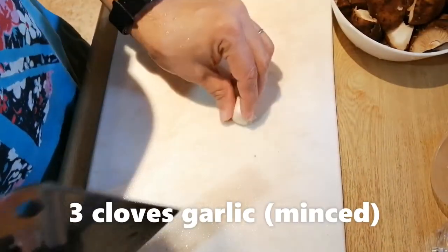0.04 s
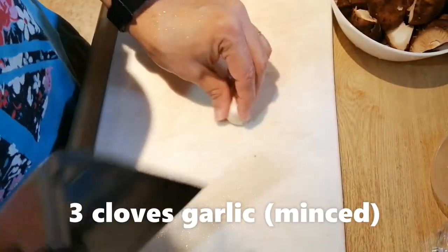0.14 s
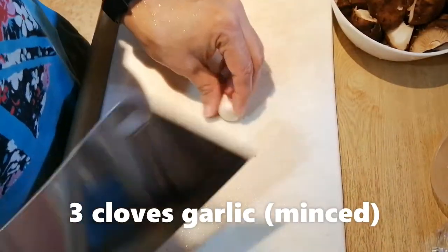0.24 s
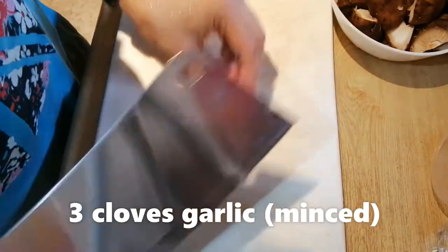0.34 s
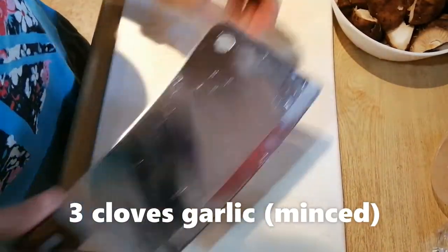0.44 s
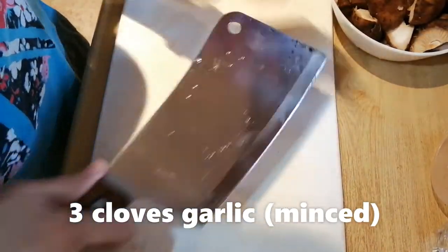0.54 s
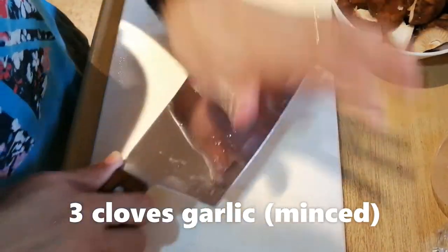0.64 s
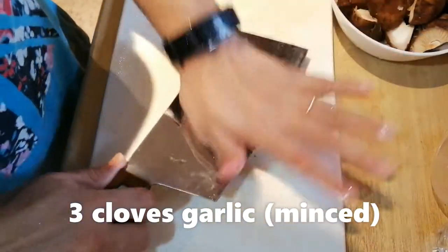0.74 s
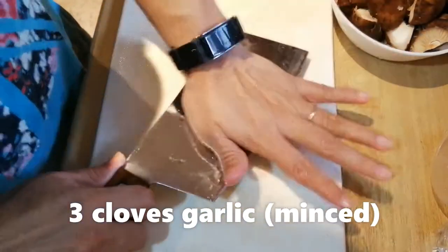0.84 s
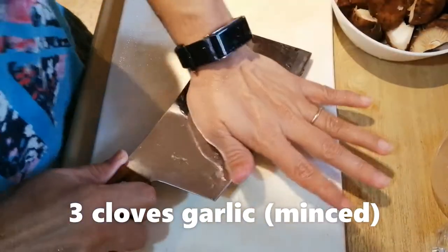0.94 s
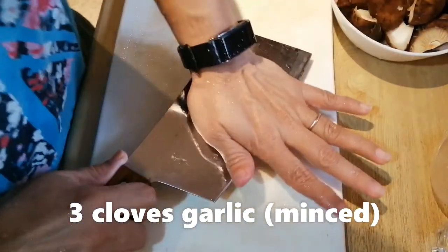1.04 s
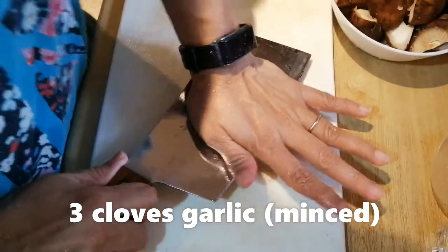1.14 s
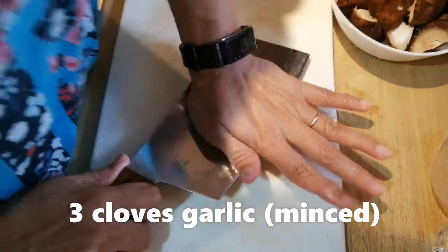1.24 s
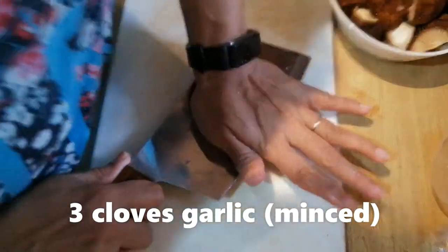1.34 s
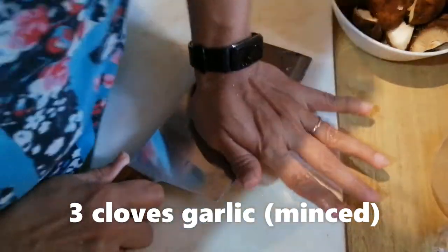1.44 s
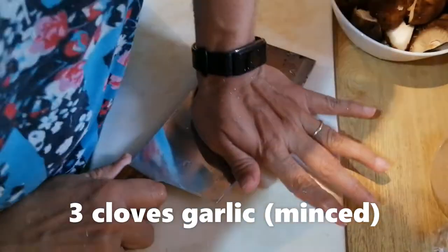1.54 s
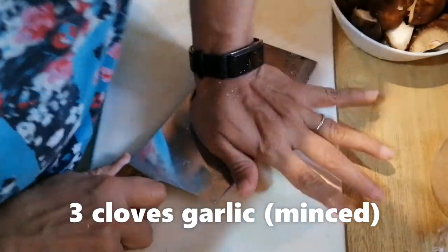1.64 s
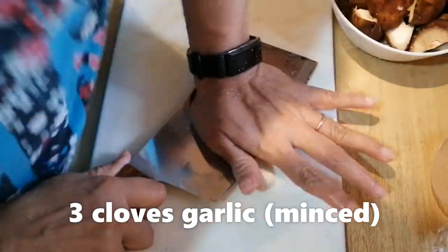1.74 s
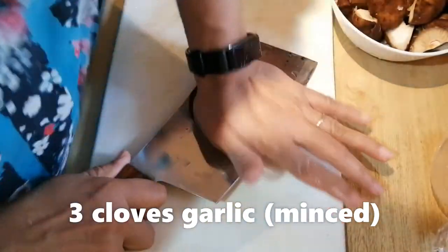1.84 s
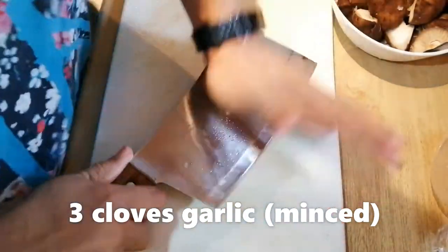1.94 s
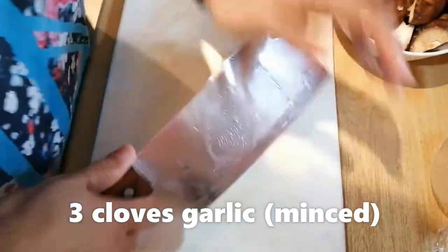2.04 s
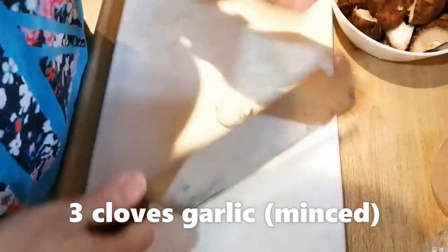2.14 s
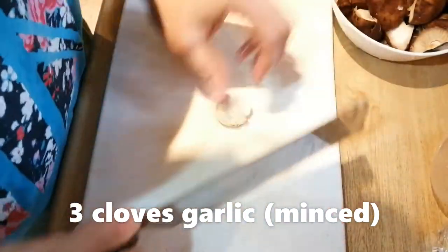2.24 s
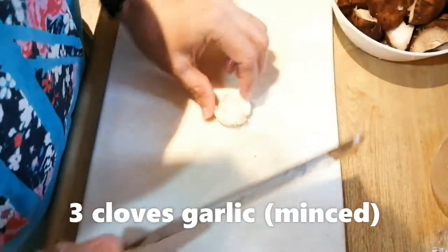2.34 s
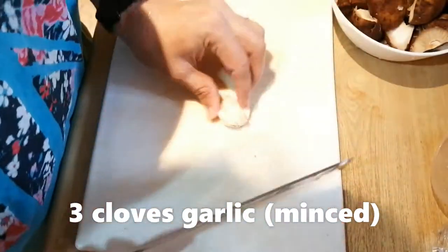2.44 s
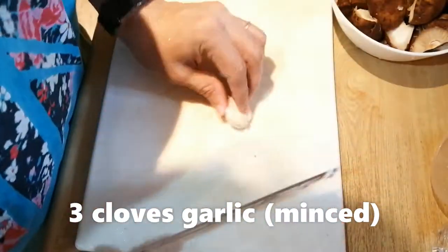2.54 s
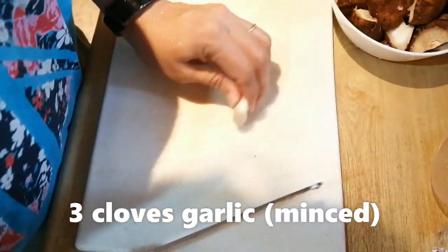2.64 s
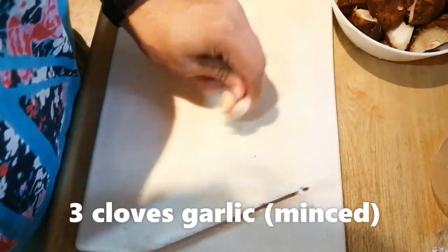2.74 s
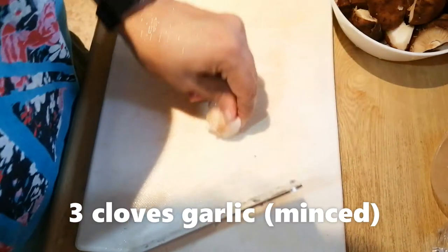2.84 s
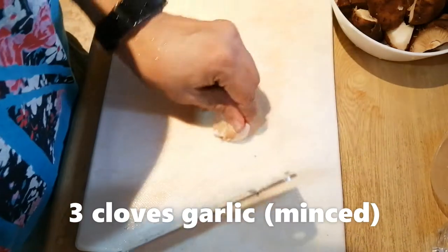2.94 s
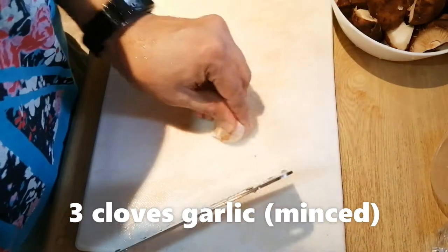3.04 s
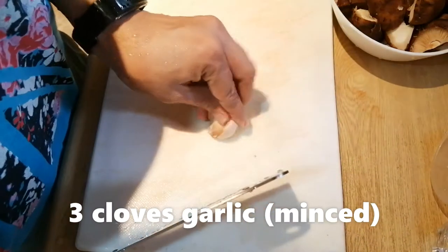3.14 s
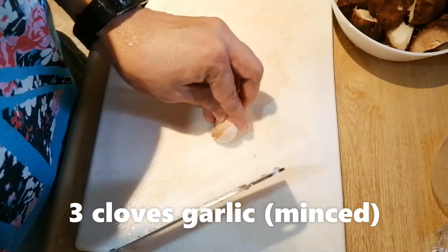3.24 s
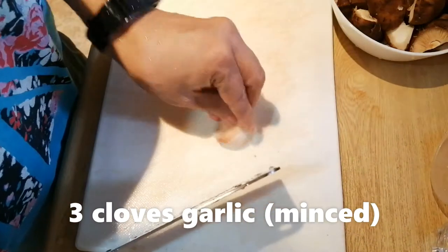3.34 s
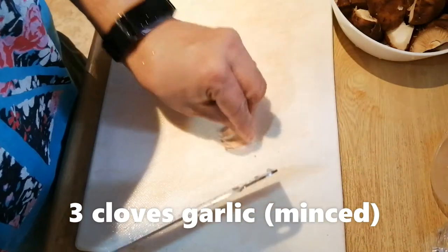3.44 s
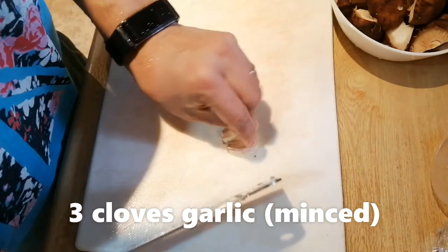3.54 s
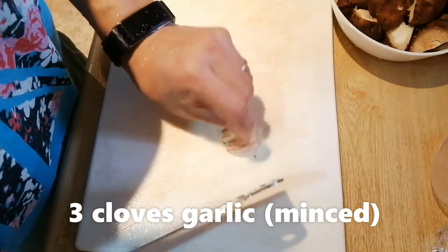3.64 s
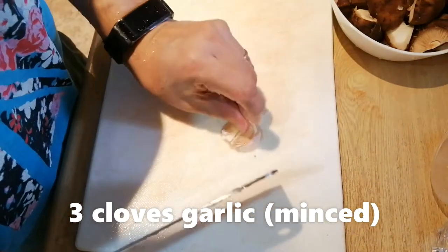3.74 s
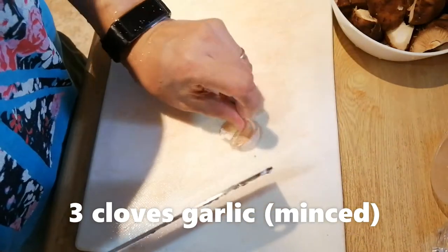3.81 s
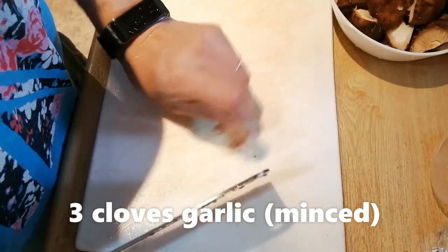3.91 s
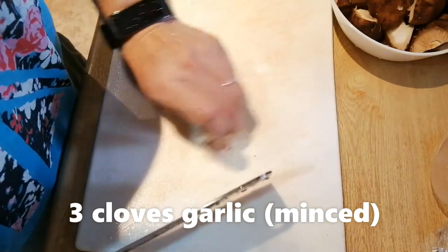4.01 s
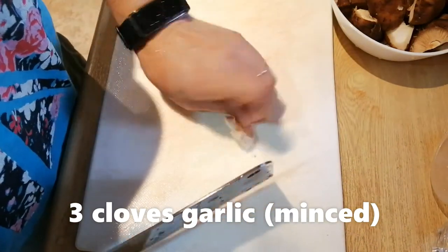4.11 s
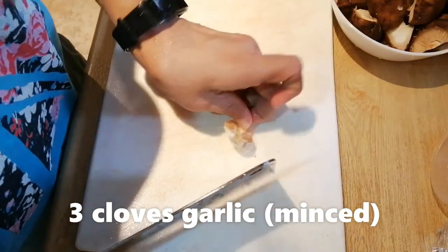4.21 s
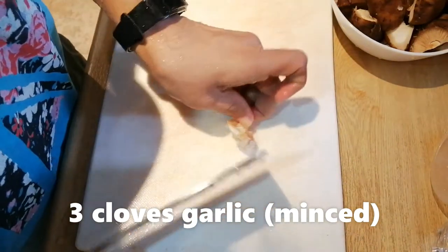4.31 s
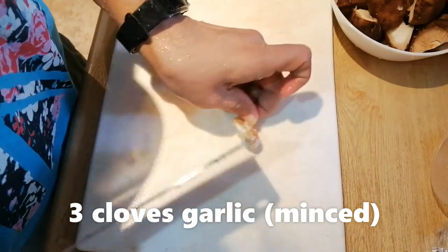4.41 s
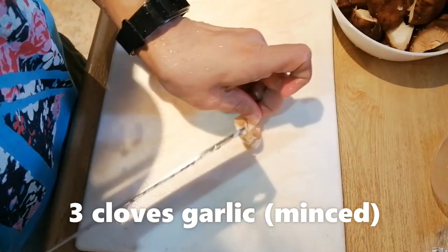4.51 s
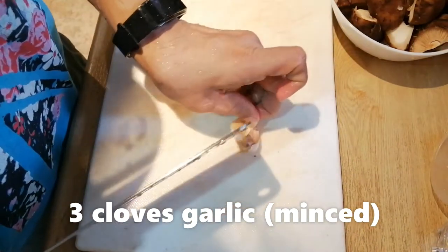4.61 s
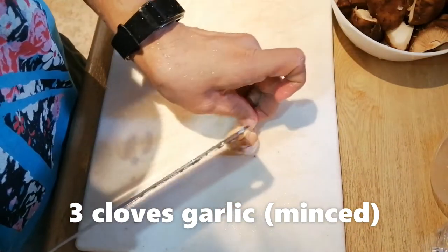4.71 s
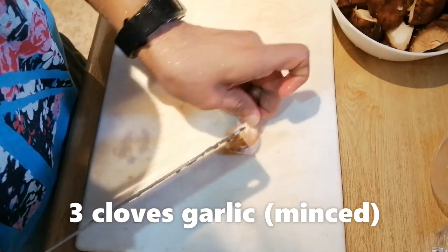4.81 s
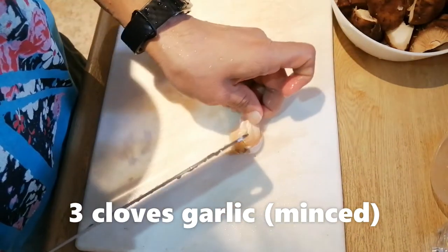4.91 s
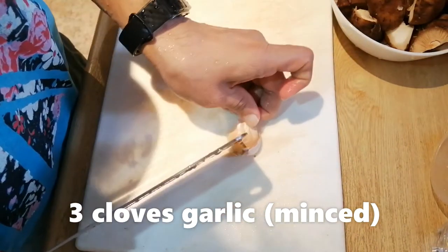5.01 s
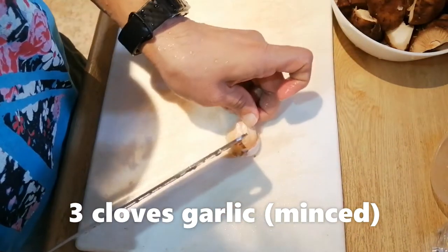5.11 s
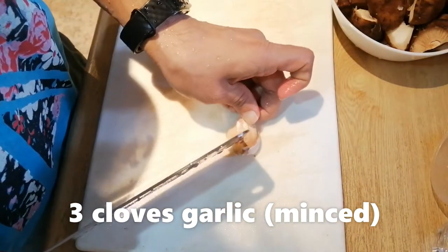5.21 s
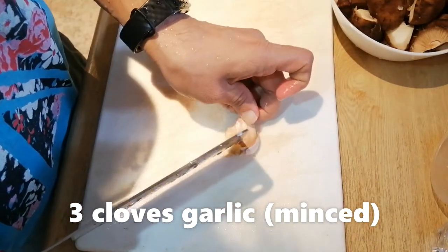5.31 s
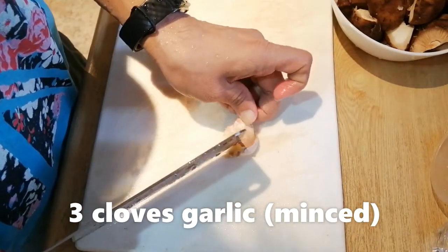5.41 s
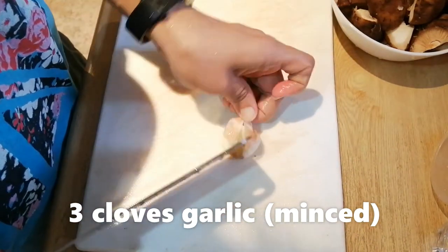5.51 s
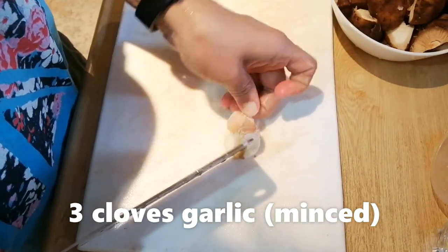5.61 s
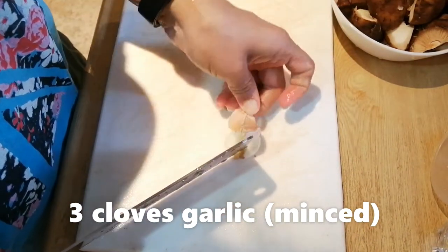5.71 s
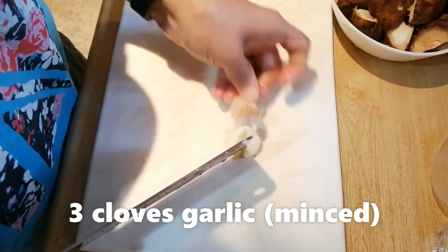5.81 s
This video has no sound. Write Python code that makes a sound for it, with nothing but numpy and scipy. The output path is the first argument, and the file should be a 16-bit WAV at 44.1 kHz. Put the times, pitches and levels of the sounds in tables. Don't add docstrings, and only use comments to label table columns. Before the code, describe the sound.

A low, steady appliance drone with soft bass wavering fills a reflective kitchen, heard by close stereo microphones with the board slightly left. At the start there is a faint knock, then tiny steel taps and a light blade slide until 0.4 s. Around 0.85-0.95 s a palm lands on the blade in a cluster of dull thumps, with rubbing and creaking. A first crunch comes at 1.14 s; the loudest, sharpest splits and deep board thuds strike at 1.3 and 1.4 s, with smaller cracks to 1.67 s. At about 1.9 s the blade unsticks with a wet, crackly pop, then slides softly away at 2.1-2.5 s. From 2.5 to 4 s, sparse dry skin snaps and fine rustles follow, very quiet. More papery ticks sound at 4.0-4.25 s, fainter scrapes around 4.7-5 s, and a brighter cluster of crisp snaps near 5.5-5.65 s, before a last tiny tick.

```python
import sys
import numpy as np
from scipy import signal
from scipy.fft import rfft, irfft, next_fast_len
from scipy.io import wavfile
from scipy.ndimage import map_coordinates

SR = 44100
rng = np.random.default_rng(int(sys.argv[2]) if len(sys.argv) > 2 else 0)


def voltage_ratio(decibels):
    exponent = np.asarray(decibels, float) / 20
    return 10 ** exponent


def dump_mix(stems):
    frames = np.atleast_2d(stems).T
    limited = np.clip(frames, -1, 1)
    pcm = np.round(limited * 32767).astype(np.int16)
    wavfile.write(sys.argv[1], SR, pcm)


N = 258426

# frequency in Hz, level in dB per Hz.
DRONE_COLOR = [(12, -23), (20, 8.5), (48, -3.5), (70, -3), (150, -3.5), (182, -7), (293, -7), (319, -10),
               (600, -14.5), (1030, -14.5), (1120, -16.5), (2820, -24), (4670, -36), (5380, -33),
               (11100, -51.5), (16000, -78)]
# time in seconds, level in dB.
DRONE_LEVEL = [(0, -59), (.7, -59), (1.8, -58.5), (2.6, -61.5), (3.3, -59), (3.8, -62), (4.1, -60.5),
               (4.5, -60), (5, -60.5), (5.86, -60.5)]
# frequency in Hz, likeness from -1 to 1.
LIKENESS = [(60, 0.71), (130, 0.79), (290, 0.63), (640, 0.38), (1410, -0.36), (3100, 0.21), (6820, -0.27),
            (15000, 0.47)]
# pitch in Hz, width in Hz.
ROOM_MODES = [(147, 25.6), (207, 24), (293, 36)]
# start in seconds, level in dB, hold in seconds.
MODE_SWELLS = [
    [(0, -59, 0.094), (.4, -68, 0.17), (2.04, -64, 0.017), (2.68, -66, 0.045), (3.06, -70, 0.84),
     (4.36, -64, 0.14), (4.72, -62.5, 0.087), (5.03, -65, 0.42), (5.75, -69.5, 0.12)],
    [(0, -57, 0.049), (.3, -63.5, 0.11), (2.45, -67.5, 0.061), (2.76, -62.5, 0.076), (3.06, -75.5, 0.13),
     (4.1, -65, .05), (5.42, -67.5, 0.13)],
    [(3.8, -67.5, 0.31), (4.27, -63.5, 0.12)],
]
# start in seconds, level in dB, hold in seconds.
TRAFFIC = [
    (2.65, -70, 1),
    (5.1, -84, .3),
]
# frequency in Hz, seconds to fall by 60 dB.
ROOM_DECAY = [(100, 0.24), (500, 0.69), (2500, 0.61), (6000, 0.65), (14000, 0.26)]
# frequency in Hz, level in dB.
ROOM_COLOR = [(60, -44), (300, -4.5), (1000, -2), (3000, -9.5), (8000, -8), (15000, -2.5)]
# time in seconds, level in dB.
SLIDES = [
    [(.12, -82), (.17, -90), (.25, -73), (.36, -78), (.45, -100)],
    [(.7, -96), (.75, -64.5), (.82, -62), (.9, -62.5), (.97, -65), (1.04, -60.5), (1.11, -59),
     (1.16, -64.5), (1.29, -57)],
    [(2.12, -101), (2.25, -73.5), (2.4, -70), (2.5, -79), (2.56, -82)],
]
# pitch in Hz, width in Hz, level in dB.
BLADE_SHEEN = [(2700, 420, -1.5), (5280, 570, -6), (7500, 1240, -9), (10300, 1000, -10),
               (12600, 2800, -16.5), (4000, 5600, -20.5)]
# start in seconds, level in dB, hold in seconds.
BLADE_SINGING = [
    (.16, -79, 0.086),
    (.43, -87, .1),
]
# start in seconds, level in dB, hold in seconds.
CREAKS = [
    (.87, -57.5, .1),
    (1.15, -54, 0.082),
    (1.31, -40.5, 0.06),
    (1.41, -47, 0.048),
    (1.49, -47, 0.074),
    (1.58, -51, 0.064),
]
# pitch in Hz, width in Hz, level in dB.
CREAK_MODES = [(208.8, 39, -2.5), (371, 140, -7), (540, 153, -3.5), (727, 57, -7.5), (1049, 400, -13.5)]
# pitch in Hz, level in dB, seconds to fall by 60 dB.
COUNTER_MODES = [(41.3, -31, 0.093), (76, -4.5, 0.11), (111.2, -2.5, 0.31), (119, 1.5, 0.11),
                 (166.6, -10, 0.02)]
# pitch in Hz, level in dB, seconds to fall by 60 dB.
BOARD_MODES = [(212, -5, 0.16), (266.5, -13, 0.14), (288, -18.5, 0.025), (370.5, 1, 0.061),
               (451, -10, 0.051), (526.4, -5.5, 0.094), (616, -15, 0.16), (724, -4, 0.033),
               (972, -3, 0.052)]
# start in seconds, level in dB, contact in seconds.
KNOCKS = [(.018, -33, 0.0013), (0.045, -38.5, 0.0013), (.844, -38.5, 0.00066), (0.864, -39, 0.0029),
          (0.892, -27, 0.0034), (1.137, -25.5, 0.0015), (1.173, -41, 0.0013), (1.3, -14, 0.001),
          (1.318, -20.5, 0.0017), (1.395, -22.5, 0.0008), (1.402, -11.5, 0.0031), (1.409, -22.5, 0.0014),
          (1.446, -36, 0.0026), (1.486, -25, 0.00045), (1.534, -28, 0.00043), (1.569, -31.5, 0.001),
          (1.654, -42, 0.0023), (3.533, -42.5, 0.0026)]
# start in seconds, level in dB.
PUSHES = [(0.046, -45), (0.948, -23), (0.966, -30.5), (0.981, -28.5), (1.171, -33), (1.321, -14.5),
          (1.393, -33), (1.413, -7), (1.422, -15), (1.436, -15.5), (1.453, -49), (1.479, -18.5),
          (1.503, -28), (1.534, -54.5), (1.569, -41)]
# start in seconds, level in dB.
PALM_ROLL = [
    (.847, -21),
    (0.8603, -12.5),
    (0.87, -16),
    (.877, -13.5),
    (0.89, -5),
    (0.9012, -25),
    (0.9064, -16),
    (0.916, -20),
]
# start in seconds, peak in dB, pitch in Hz, brightness in dB.
STEEL_TAPS = [(.018, -50.5, 2380, -6), (.16, -60, 5800, -11), (.1765, -51, 2900, -6),
              (.191, -59, 2900, -20), (.3582, -50.5, 2980, 1), (.3584, -61, 5000, -11),
              (.8655, -31.5, 2770, -15), (.8657, -40, 1770, -30), (.8654, -37.5, 5200, -34),
              (.8662, -39, 10200, -14), (.8814, -44, 10300, -14), (1.393, -35, 1800, -13),
              (1.4084, -18.5, 1720, -8.5), (2.5968, -50, 2130, -8), (2.6483, -57.5, 2230, -6),
              (4.116, -70, 2200, -33), (4.995, -64, 2300, -33), (5.571, -50, 2630, -30),
              (5.6086, -51, 1280, -30), (5.631, -51, 2840, -32)]
# start in seconds, level in dB, hold in seconds.
SKIN_STROKES = [(2.55, -76, 0.066), (2.67, -64, 0.024), (2.8, -71, 0.023), (2.945, -84, .01),
                (3.1, -75, 0.098), (3.28, -86, 0.16), (3.42, -78, 0.016), (3.48, -62, 0.073),
                (3.79, -72.5, 0.083), (4.02, -62.5, 0.04), (4.135, -62.5, 0.024), (4.2, -75, 0.065),
                (4.25, -75, 0.018), (4.5, -73.5, 0.023), (4.75, -71, 0.086), (4.82, -77, 0.015),
                (4.9, -66.5, 0.041), (4.97, -77, 0.18), (5.2, -75.5, 0.16), (5.48, -77, 0.031),
                (5.58, -62.5, 0.018), (5.615, -57, 0.032), (5.68, -79, .03), (5.82, -75, 0.026)]
# frequency in Hz, level in dB per Hz.
SKIN_COLOR = [(2500, -28), (4000, -5.5), (5000, -4), (7000, -3), (8600, -1), (10200, 0.5), (11800, -13),
              (15500, -2)]
# start in seconds, peak in dB, pitch in Hz, left-right
# difference in dB.
SKIN_SNAPS = [(2.163, -64, 10300, 0), (2.4383, -58, 9000, 1), (2.5348, -61, 8120, 3),
              (2.5465, -58, 6200, 0), (2.598, -48, 11000, -6), (2.649, -44, 10800, 4),
              (2.662, -55, 10300, -5), (2.671, -52, 8500, 7), (2.681, -67, 4800, 1), (2.691, -66, 4500, 2),
              (2.713, -62, 7200, -2), (2.793, -53.5, 7870, 4), (2.804, -55, 7840, -5),
              (2.813, -54, 5800, 0), (2.82, -52, 7500, 2), (2.829, -60, 6500, 0), (2.9093, -62, 11100, -14),
              (2.936, -64, 11000, 0), (2.9514, -58, 4680, -3), (2.957, -61, 9000, 0), (2.994, -63, 9300, 1),
              (3.087, -62, 10000, 0), (3.0996, -53, 10000, 7), (3.162, -58, 9800, 12),
              (3.2687, -56, 9800, 1), (3.2755, -58, 5040, 7), (3.2865, -59, 9000, 0),
              (3.3173, -52.5, 4950, 6), (3.339, -64, 9500, 0), (3.39, -62, 4170, 2),
              (3.418, -57.5, 5460, 3), (3.4643, -50.5, 10500, -2), (3.5084, -60, 10050, -2),
              (3.521, -47.5, 9800, 9), (3.531, -54, 7500, -11), (3.5454, -51, 7200, -6),
              (3.758, -57.5, 8000, -4), (3.7715, -58, 4920, 2.5), (3.796, -53.5, 10000, -4),
              (3.839, -57, 7200, -1),
              (4.037, -51, 10400, 1), (4.049, -53, 10200, 2), (4.088, -42, 10900, 1),
              (4.1035, -52, 14000, 0), (4.117, -46, 4800, 7), (4.125, -42.5, 10300, -4),
              (4.139, -58, 10900, -3), (4.16, -53, 10100, 1), (4.2505, -59, 7560, -2),
              (4.681, -63, 10400, 2), (4.729, -59, 5440, -3), (4.756, -57, 9670, -4), (4.767, -63, 9600, 1),
              (4.814, -51, 9500, 5), (4.821, -54, 9500, 7), (4.828, -62, 6200, 2), (4.8494, -66, 5800, 6),
              (4.88, -59, 5600, 2), (4.9046, -58, 4970, 5), (4.905, -55, 10800, 0), (4.954, -65, 9500, 6),
              (4.996, -46.5, 5070, -1), (4.9952, -56, 3700, -2), (4.9961, -56, 6450, -2.5),
              (5.466, -43, 11300, -10.5), (5.541, -65, 4840, -1), (5.556, -48, 9500, 2),
              (5.563, -49, 7400, 0), (5.5728, -41, 10600, -16), (5.6048, -41.5, 7400, 11),
              (5.61, -37, 4950, 8), (5.61, -37.5, 10600, -17), (5.631, -42.5, 10400, -14),
              (5.643, -50, 10400, -2), (5.756, -63, 7500, -2), (5.8514, -57, 7300, 10),
              (5.8516, -51, 4160, -4)]
# pitch in Hz, level in dB.
HUSK_BANDS = [(4900, -9.5), (7300, -3.5), (10500, -2), (14000, -9)]
# start in seconds, level in dB, hold in seconds.
FIBRE_TEARS = [
    (1.15, -54.5, 0.044),
    (1.41, -46, 0.0091),
    (1.53, -48.5, 0.013),
]
# frequency in Hz, level in dB per Hz.
FIBRE_COLOR = [(400, -6), (600, -3), (1000, -4), (1600, -5), (3200, -22), (4200, -4), (4800, -7),
               (10000, -12), (15500, -31)]
# start in seconds, level in dB, hold in seconds.
DEEP_SPLIT = [
    (1.31, -42, 0.053),
]
# frequency in Hz, level in dB per Hz.
FLESH_COLOR = [(500, -17), (1000, 2), (1800, -3), (3500, 1), (4300, -16), (4900, -20), (9000, -13),
               (15500, -40)]
# start in seconds, level in dB, hold in seconds.
STICKY_RELEASE = [
    (1.415, -61, 0.04),
    (1.545, -50.5, 0.015),
    (1.905, -47, 0.054),
]
# frequency in Hz, level in dB per Hz.
STICKY_COLOR = [(470, -46), (800, -18.5), (2270, -6), (2470, -5), (5270, -8.5), (10800, -20.5),
                (14900, -38), (15500, -50)]
# start in seconds, peak in dB, pitch in Hz, brightness in dB,
# left-right difference in dB.
CRACKS = [(.846, -42.5, 600, -40, -6.5), (.894, -59, 9000, -6, 3), (.9755, -47.5, 5260, -2, 3),
          (1.052, -60, 11000, -8, 3), (1.104, -52, 5500, 7, 12), (1.1114, -50, 5070, 2, 10),
          (1.1388, -26, 2460, -14, 1), (1.139, -27, 6440, -14, 9), (1.1454, -31, 4190, -6, 8),
          (1.2595, -46, 3600, 9.5, 9), (1.2999, -11.5, 1800, -25, 6), (1.3004, -11.5, 3150, -15, 6),
          (1.3087, -30, 1640, -24, 11), (1.3434, -30, 2380, -26.5, 11), (1.391, -33, 2000, -13, -5),
          (1.3951, -11.5, 2560, -9.5, -3), (1.396, -22.5, 6370, -2.5, 7), (1.4024, -16.5, 2820, -4, 2.5),
          (1.4863, -27.5, 2010, -0.5, -1.5), (1.4866, -26, 5200, -2, 6), (1.5332, -16.5, 2330, -13, 1.5),
          (1.5342, -24, 4440, -6, 8), (1.5404, -45, 2440, -10, 3), (1.5673, -30, 2000, 1, 2),
          (1.6652, -32.5, 7700, -31, 7), (1.6655, -41.5, 4000, -20, 3), (1.8955, -39.5, 900, -30, 2.5),
          (1.8955, -20, 2120, -27, -4.5), (1.8958, -23.5, 4500, -31, -7), (1.9034, -27.5, 3280, -18, 0)]
# frequency in Hz, level in dB.
MIC_RESPONSE = [(20, -8), (60, 0), (7800, 0), (8300, -4), (8800, 0), (11000, 0), (12500, -4), (15150, -5),
                (15450, -28), (16500, -31)]


def unit(x):
    return x / np.sqrt(np.mean(x ** 2) + 1e-20)


def along(points, hz):
    f, v = np.transpose(points)
    return np.interp(np.log(hz + 1), np.log(f + 1), v)


def level_curve(rows):
    s, db = np.transpose(rows)
    return np.interp(np.arange(N) / SR, s, db)


def wobble(rate):
    knots = rng.standard_normal(int(N * rate / SR) + 4)
    return map_coordinates(knots, [np.arange(N) * rate / SR])


def swell(rows, rise, fall):
    t = np.arange(N) / SR
    gain = 0
    for s, db, hold in rows:
        climb = rise * np.maximum(s - t, 0)
        fade = fall * np.maximum(t - s - hold, 0)
        gain = gain + voltage_ratio(db - climb - fade)
    return gain


def filtered(x, response):
    m = next_fast_len(N + SR // 2)
    return irfft(rfft(x, m) * response(np.fft.rfftfreq(m, 1 / SR)), m)[..., :N]


def colored(x, color):
    return unit(filtered(x, lambda hz: voltage_ratio(along(color, hz))))


def peaks(rows):
    def response(f):
        total = 0
        for k, (hz, width, db) in enumerate(rows):
            total = total + (-1) ** k * voltage_ratio(db) * 1j * f * width / (hz * hz - f * f + 1j * f * width)
        return total
    return response


def resonant(x, rows):
    return unit(filtered(x, lambda f: peaks(rows)(f) ** 2))


def grit(rate, spread_db):
    size = np.minimum(rng.exponential(size=N), 2)
    return unit((rng.random(N) < rate / SR) * rng.standard_normal(N) * voltage_ratio(spread_db * size))


def add(track, s, sound, pan_db):
    half = np.clip(pan_db, -9, 9) / 2
    start = round(s * SR)
    track[:, start:start + sound.shape[-1]] += sound * voltage_ratio([[half], [-half], [0]])


def burst(t, hz, t60, width):
    b, a = signal.iirpeak(np.clip(hz, 200, 18000), 1 / np.clip(1.5 * width, .1, 1.3), SR)
    kick = np.arange(len(t)) == 0
    both, left, right = rng.standard_normal((3, len(t))) * voltage_ratio(-60 * t / t60)
    drive = [5.8 * kick + both + 1.28 * left, 4.8 * kick + both + 1.37 * right, kick]
    x = signal.lfilter(b, a, signal.lfilter(b, a, drive))
    x = x / np.linalg.norm(x, axis=1, keepdims=True)
    return x / np.abs(x[:2]).max()


def rough_hits(rows, width, t60):
    out, t = np.zeros((3, N + SR)), np.arange(SR // 16) / SR
    lean_db = 1.5 * np.array([[-1], [1], [0]])
    for s, db, hz, bright_db, pan_db in rows:
        spit = voltage_ratio(bright_db + lean_db) * burst(t, 8500, .7 * t60, width=.6)
        add(out, s, voltage_ratio(db) * (burst(t, hz, t60, width) + spit), pan_db)
    return out[:, :N]


def traffic():
    hush = resonant(rng.standard_normal((2, N)), [(960, 600, 0)])
    return swell(TRAFFIC, rise=28, fall=28) * voltage_ratio(2.5 * wobble(6)) * hush


def booming():
    rest_db, slope = -75, 214
    out = 0
    for (hz, width), rows in zip(ROOM_MODES, MODE_SWELLS):
        gain = voltage_ratio(rest_db + 4.0 * wobble(5)) + swell(rows, slope, slope)
        out = out + gain * resonant(rng.standard_normal(N), [(hz, width, 0)])
    return out


def drone():
    def middle_and_side(hz):
        turn = np.arccos(np.clip(along(LIKENESS, hz), -1, 1)) / 2
        return voltage_ratio(along(DRONE_COLOR, hz)) * [np.cos(turn), np.sin(turn)]

    mid, side = filtered(rng.standard_normal((2, N)), middle_and_side)
    level_db = level_curve(DRONE_LEVEL) + 3.0 + 0.7 * wobble(3.724)
    air = voltage_ratio(level_db) * unit(np.array([mid + side, mid - side]))
    return air + booming() + traffic()


def kitchen(x):
    hz, t, z = signal.stft(rng.standard_normal((2, SR)), SR, nperseg=256)
    fade = voltage_ratio(-60 * t / along(ROOM_DECAY, hz)[:, None])
    tail = signal.istft(z * fade, SR, nperseg=256)[1]
    build_up = 1 - np.exp(-np.arange(tail.shape[1]) / SR / 0.0028)
    tail = tail * build_up / np.linalg.norm(tail[0])
    answer = signal.fftconvolve(x[None], tail, axes=1)[:, :N]
    return filtered(answer, lambda f: voltage_ratio(along(ROOM_COLOR, f)))


def slide():
    points = []
    for span in SLIDES:
        points += [(span[0][0] - .03, -120), *span, (span[-1][0] + .03, -120)]
    rub = rng.standard_normal(N) + .5 * grit(1500, spread_db=2)
    gain = voltage_ratio(level_curve(points) - 0.5 + 0.8 * wobble(31.9))
    return gain * unit(filtered(rub, peaks(BLADE_SHEEN))) * voltage_ratio([[1.5], [-1.5], [0]])


def singing_blade():
    return swell(BLADE_SINGING, rise=450, fall=510) * resonant(rng.standard_normal(N), [(7400, 350, 0)])


def creak():
    slips = rng.standard_normal((3, N)) + 1.6 * rng.standard_normal(N)
    slips = slips * voltage_ratio(1.6 * wobble(60))
    wood = swell(CREAKS, rise=1200, fall=340) * resonant(slips, CREAK_MODES)
    return wood * voltage_ratio([[5], [-5], [-6]])


def ring(modes, t, scatter_db):
    out = 0
    for hz, db, t60 in modes:
        strength, shift = rng.standard_normal(2)
        detune = 1 + .035 * shift
        out = out + voltage_ratio(db + scatter_db * strength - 60 * t / t60) * np.sin(2 * np.pi * hz * detune * t)
    return out


def thuds():
    out, t = np.zeros((3, N + SR)), np.arange(SR // 3) / SR
    hand_s = 0.00099
    muffled = [(hz, db, 0.47 * t60) for hz, db, t60 in COUNTER_MODES]
    blows = [(s, db - 8.5, contact, BOARD_MODES, 8.5) for s, db, contact in KNOCKS]
    blows += [(s, db - 19.5, hand_s, COUNTER_MODES, 5.5) for s, db in PUSHES]
    blows += [(s, db - 21.5, hand_s, muffled, 5.5) for s, db in PALM_ROLL]
    for s, db, contact, modes, pan_db in blows:
        push = np.hanning(round(contact * SR) + 3)
        thud = signal.fftconvolve(ring(modes, t, scatter_db=3.5), push / push.sum())
        add(out, s, voltage_ratio(db) * thud, pan_db)
    return out[:, :N]


def taps():
    return rough_hits([(*row, 7) for row in STEEL_TAPS], width=0.15, t60=0.0087)


def snaps():
    out, t = np.zeros((3, N + SR)), np.arange(SR // 40) / SR
    for s, db, hz, pan_db in SKIN_SNAPS:
        click = 0
        for band_hz, band_db in HUSK_BANDS:
            band_gain = voltage_ratio(band_db + 6.7 * rng.standard_normal())
            click = click + band_gain * burst(t, band_hz, 0.013, width=0.2)
        snap = burst(t, hz, 0.017, width=0.29) + voltage_ratio(-5) * click
        tick = voltage_ratio(-81) * burst(t, 2260, 0.021, width=0.33)
        add(out, s, voltage_ratio(db + 1.0) * snap + tick, pan_db)
    return out[:, :N]


def rustle():
    tears = rng.standard_normal((3, N)) + 2.1 * grit(900, spread_db=3.5)
    fine = colored(tears * voltage_ratio(2.5 * wobble(45)), SKIN_COLOR)
    dull = unit(filtered(rng.standard_normal((3, N)), peaks([(2300, 1800, 0)])))
    return swell(SKIN_STROKES, rise=450, fall=510) * (fine + voltage_ratio(-5.5) * dull)


def tearing(effort, color, grain, clump_db):
    tears = rng.standard_normal((3, N)) + grain * grit(2000, spread_db=3)
    return effort * voltage_ratio(clump_db * wobble(69.1)) * colored(tears, color)


def crush():
    fibres = tearing(swell(FIBRE_TEARS, 1200, 180), FIBRE_COLOR, grain=1.7, clump_db=5.0)
    split = tearing(swell(DEEP_SPLIT, 1200, 180), FLESH_COLOR, grain=1.3, clump_db=5.0)
    release = tearing(swell(STICKY_RELEASE, 1200, 124), STICKY_COLOR, grain=0.54, clump_db=2.1)
    return fibres + split + release


def cracks():
    return rough_hits(CRACKS, width=0.61, t60=0.021)


def scene():
    blade = slide() + singing_blade() + taps()
    board = creak() + thuds()
    clove = snaps() + rustle() + crush() + cracks()
    left, right, feed = blade + board + clove
    late = np.pad(right, (2, 0))[:N]
    return np.array([left, late]) + kitchen(feed) + drone()


def roll_off(x):
    return signal.sosfilt(signal.butter(12, 16520, fs=SR, output="sos"), x)


def record(dry):
    heard = dry + voltage_ratio(-81.5) * rng.standard_normal(dry.shape)
    mix = filtered(heard, lambda hz: voltage_ratio(along(MIC_RESPONSE, hz)))
    return roll_off(mix)


dry = scene()
out = record(dry)
dump_mix(out)
```